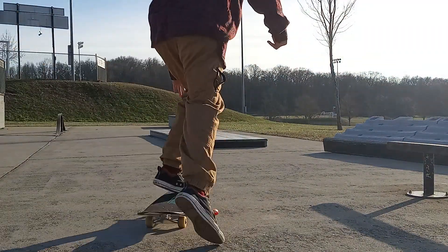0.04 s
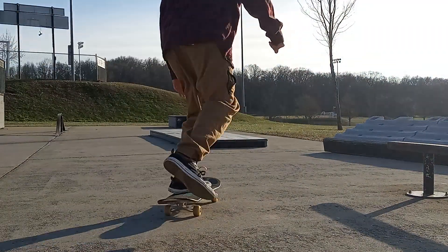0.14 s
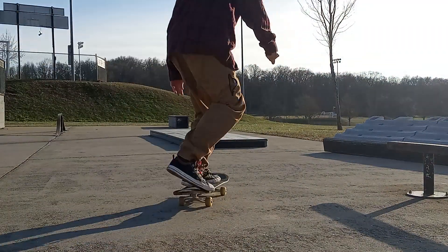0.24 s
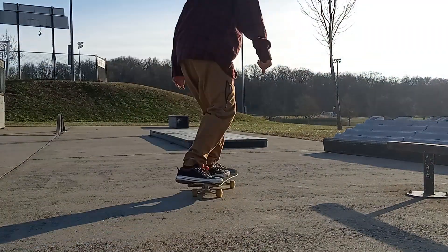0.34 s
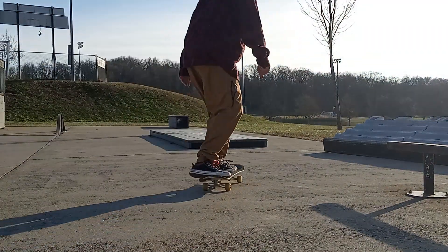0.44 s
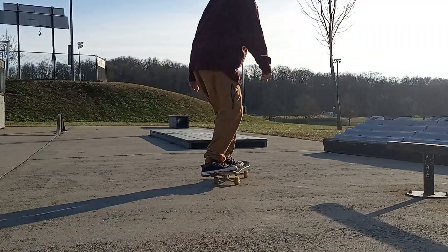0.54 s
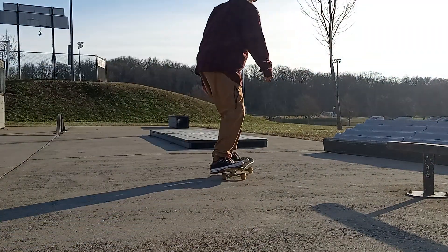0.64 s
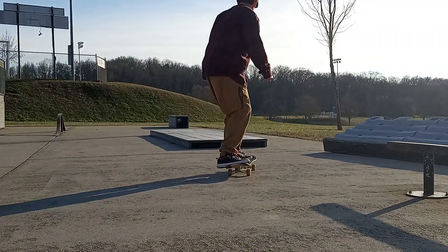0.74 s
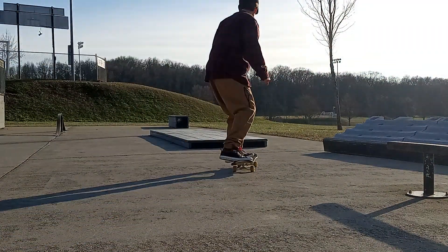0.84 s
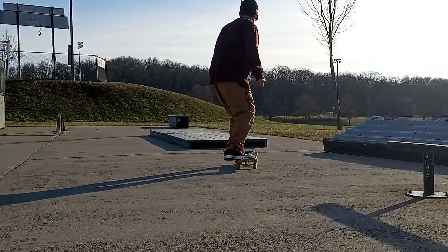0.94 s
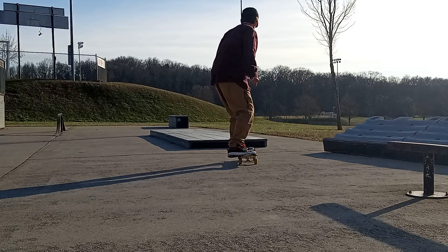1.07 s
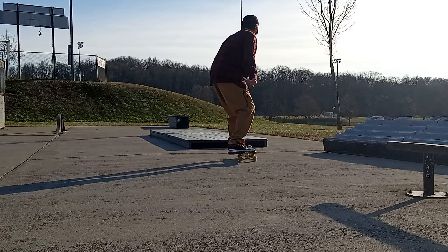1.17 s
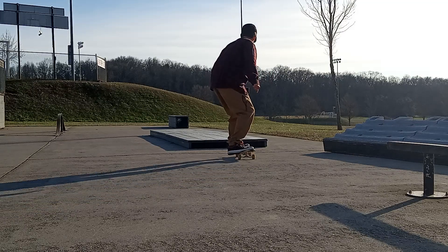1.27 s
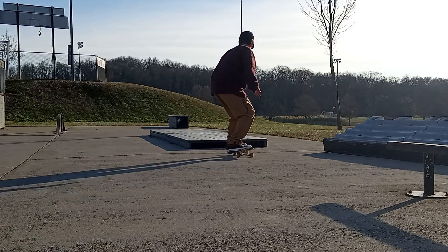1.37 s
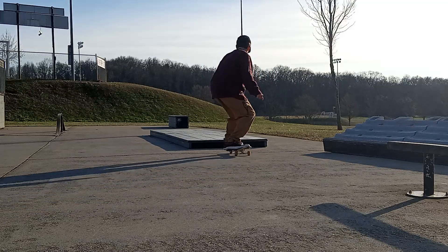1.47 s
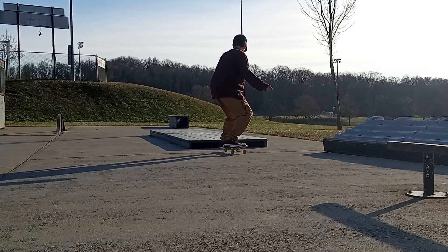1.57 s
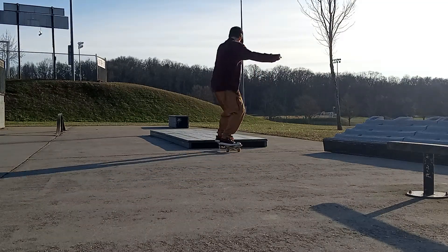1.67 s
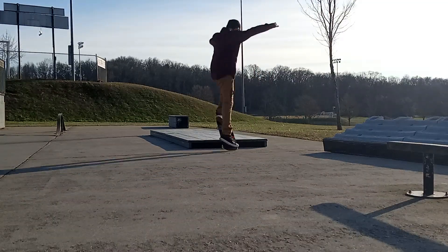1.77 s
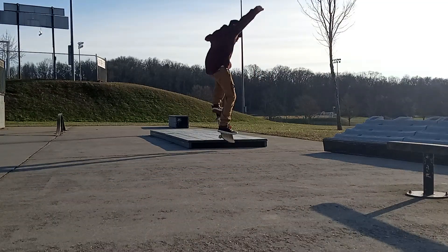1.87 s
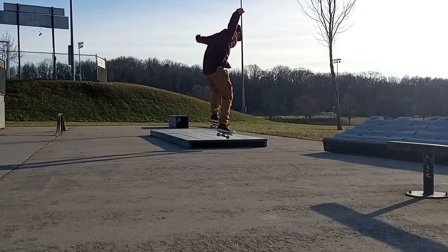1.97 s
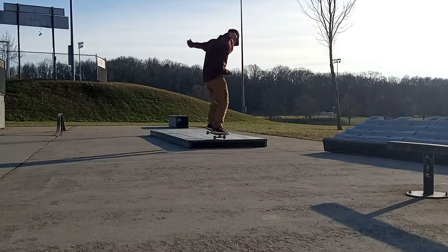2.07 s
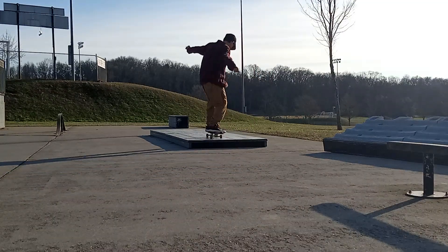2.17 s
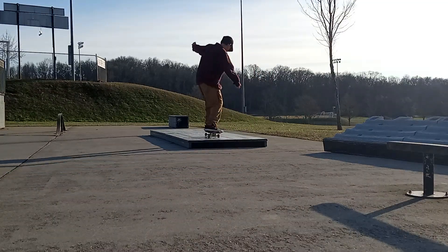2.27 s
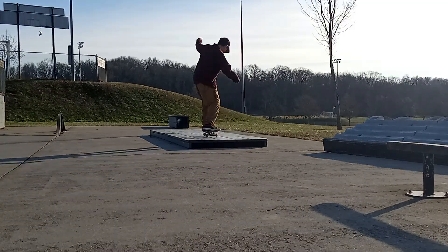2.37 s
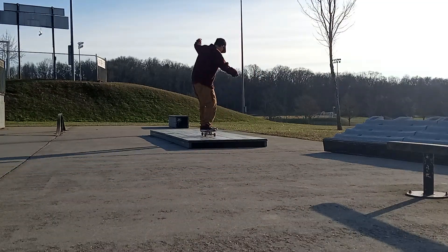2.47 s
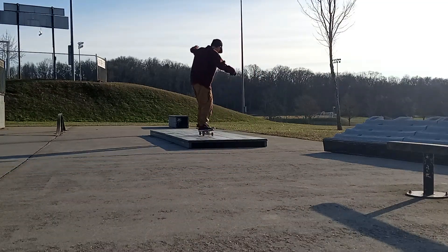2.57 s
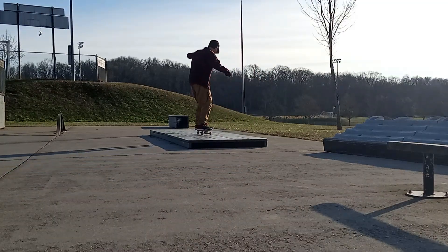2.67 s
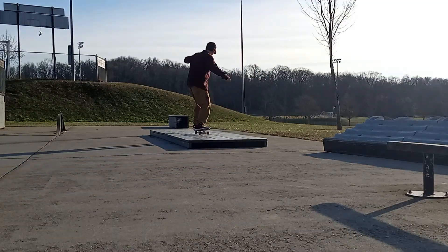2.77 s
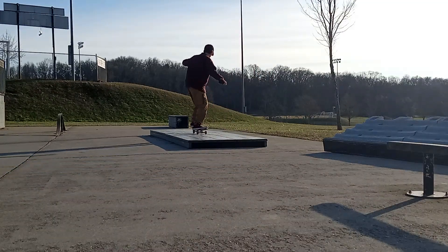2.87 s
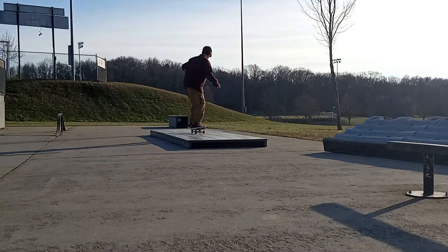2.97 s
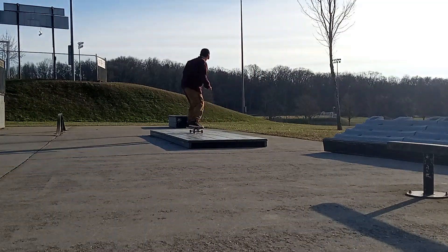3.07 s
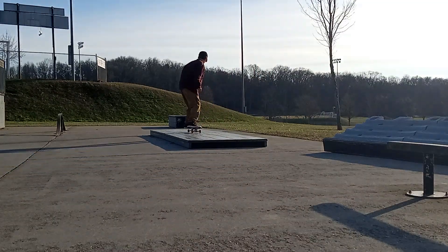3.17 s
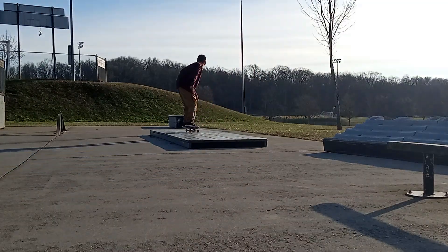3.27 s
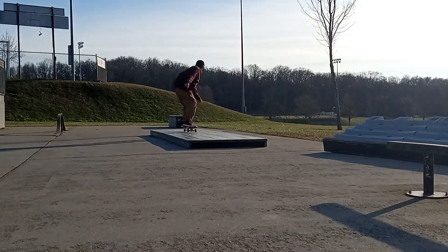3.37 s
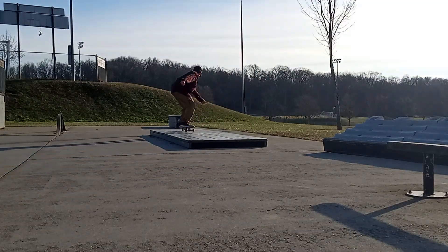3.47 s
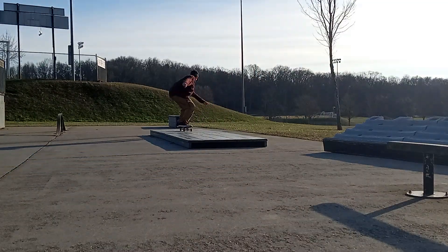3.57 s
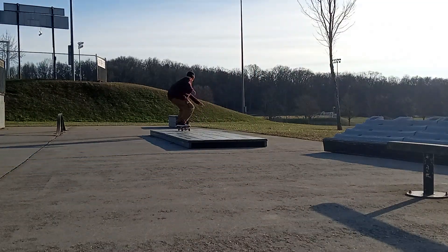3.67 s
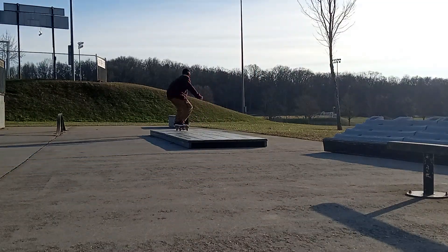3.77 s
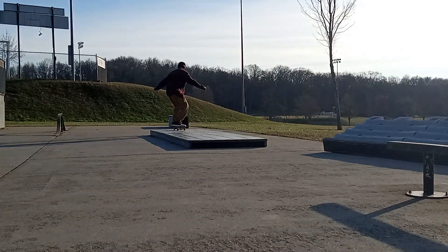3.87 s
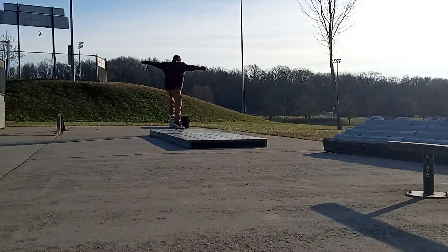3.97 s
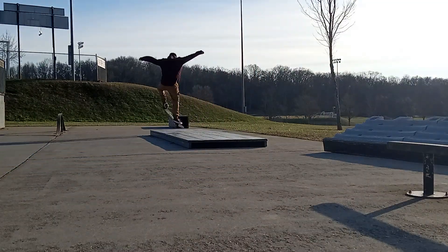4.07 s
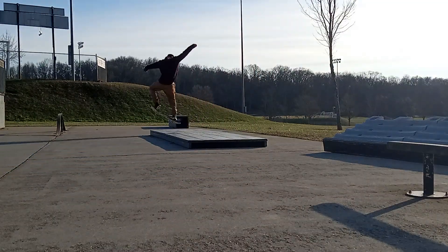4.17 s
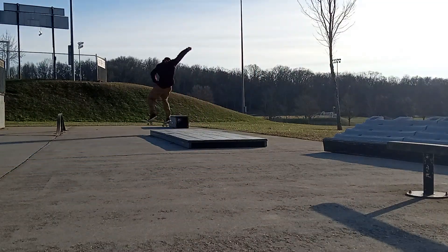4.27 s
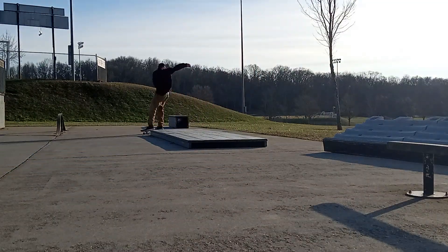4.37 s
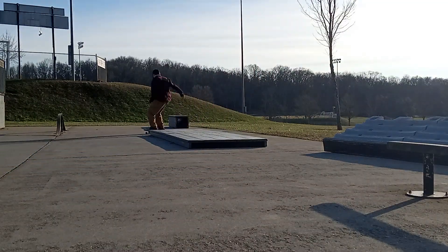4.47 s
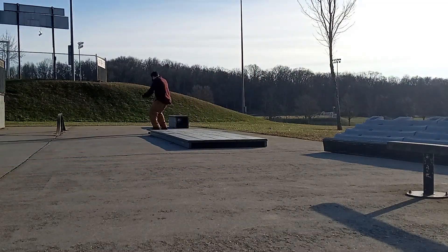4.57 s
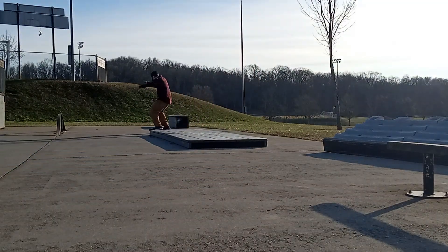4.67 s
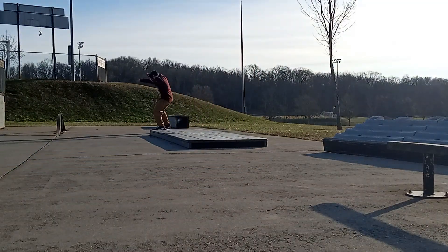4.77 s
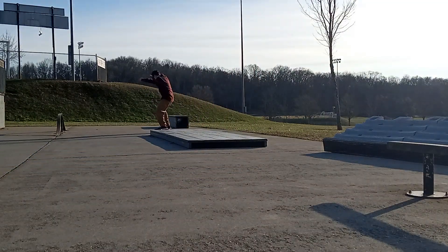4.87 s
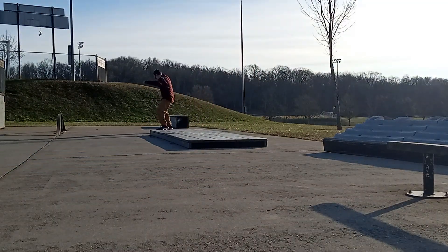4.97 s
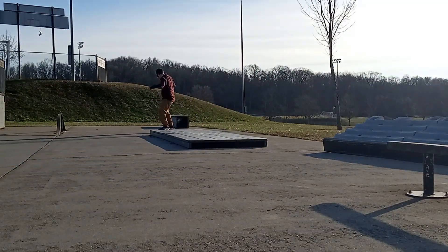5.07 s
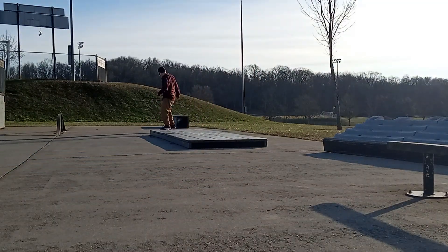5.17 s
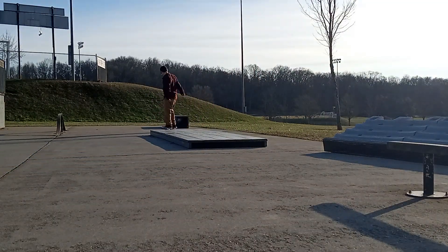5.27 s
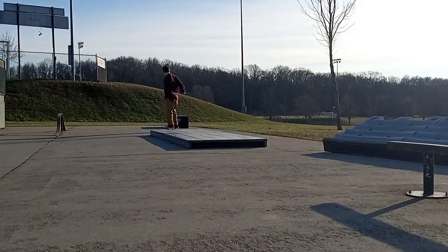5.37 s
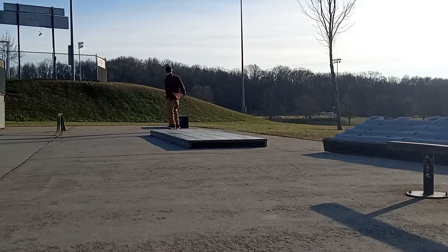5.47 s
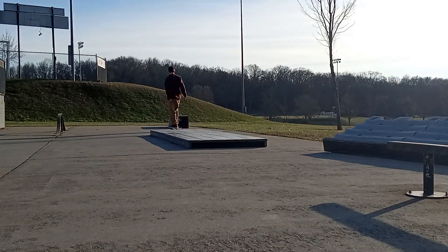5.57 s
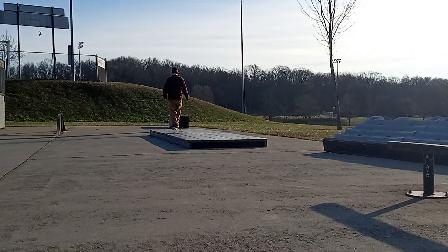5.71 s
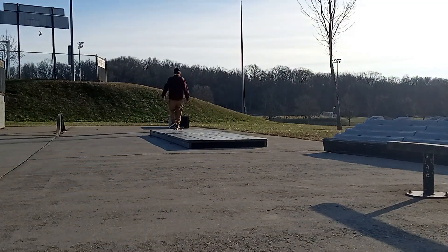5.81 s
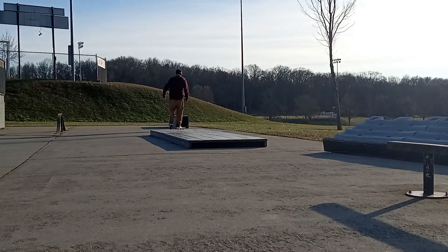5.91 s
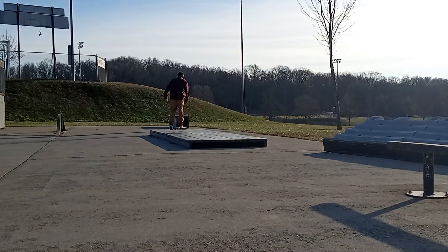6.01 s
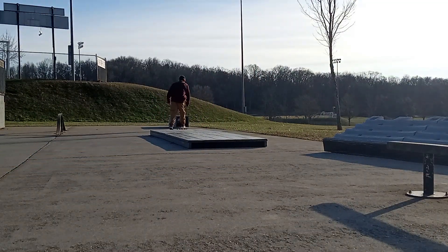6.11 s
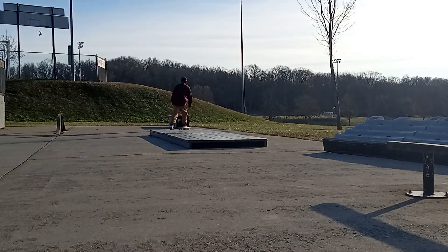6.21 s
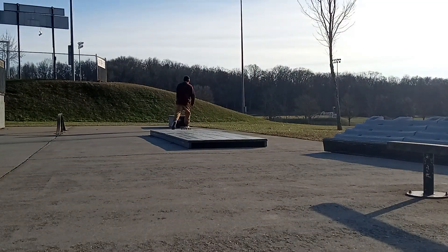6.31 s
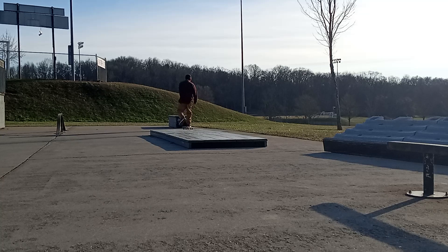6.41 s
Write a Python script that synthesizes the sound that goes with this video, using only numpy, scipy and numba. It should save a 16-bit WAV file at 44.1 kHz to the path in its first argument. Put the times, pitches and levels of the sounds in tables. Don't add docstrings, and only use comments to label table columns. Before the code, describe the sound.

Outdoors at a quiet skatepark, a phone lying near the run-up picks up a board slapping concrete loudly, then wheels grinding away over grit with small ticks and shoe squeaks. Wind thumps low on the left. The tail pops sharply, the board lands on a hollow box with a woody boom, seams knock, then a second pop and a distant crash. Only faint traffic hum and small knocks remain.

```python
import sys
import numpy as np
from scipy import signal
from scipy.fft import rfft, irfft, next_fast_len
from scipy.io import wavfile
from scipy.ndimage import uniform_filter1d
from numba import njit

SR = 44100
rng = np.random.default_rng(int(sys.argv[2]) if len(sys.argv) > 2 else 0)


def invert_db(x):
    u = np.asarray(x, float) / 20
    return 10 ** u


def log_audio(samples):
    frames = np.atleast_2d(samples).T
    limited = np.clip(frames, -1, 1)
    pcm = np.round(limited * 32767).astype(np.int16)
    wavfile.write(sys.argv[1], SR, pcm)


N = 284268
ON_BOX_S = 2.1
# peak_s, rise_s, low_mode_db, second_mode_db
BOX_BOOMS = [(2.132, 0.012, -28, -36), (2.445, 0.05, -46, -56), (2.602, 0.04, -39, -45),
             (2.768, 0.04, -49, -43), (2.895, 0.07, -42, -69), (3.012, 0.04, -37, -34),
             (3.212, 0.025, -32, -30), (3.515, 0.06, -53, -60.5), (3.685, 0.06, -58, -61),
             (3.895, 0.04, -50, -61), (4.025, 0.07, -40.5, -41), (4.148, 0.03, -49, -47)]


def unit(x):
    return x / np.sqrt(np.mean(x ** 2))


def columns(table):
    s, *rest = np.transpose(table)
    return [np.interp(np.arange(N) / SR, s, c) for c in rest]


def colour(x, points):
    size = next_fast_len(x.shape[-1])
    log_hz = np.log(np.fft.rfftfreq(size, 1 / SR) + 1)
    p = np.array(points)
    gain = invert_db(np.interp(log_hz, np.log(p[:, 0]), p[:, 1]))
    return irfft(rfft(x, size) * gain, size)[..., :x.shape[-1]]


@njit
def svf(x, hz, width):
    y, b, l = np.empty(len(x)), 0., 0.
    for i in range(len(x)):
        g, k = np.tan(np.pi * hz[i] / SR), width[i] / hz[i]
        v = (b + g * (x[i] - l)) / (1 + g * (g + k))
        b, l, y[i] = 2 * v - b, l + 2 * g * v, k * v
    return y


def band(x, hz, width):
    return svf(x, hz + 0 * x, width + 0 * x)


def between(x, lo_hz, hi_hz):
    return signal.sosfilt(signal.butter(4, [lo_hz, hi_hz], "band", fs=SR, output="sos"), x)


def walk(rate):
    k = int(SR / rate)
    held = np.repeat(rng.standard_normal(N // k + 1), k)
    return 1.8 * uniform_filter1d(uniform_filter1d(held, k), k)[:N]


def bumps(size, spread_db):
    grain = np.minimum(rng.exponential(size=size), 4)
    return rng.standard_normal(size) * invert_db(spread_db * grain)


def narrow(hz, width):
    x = band(band(rng.standard_normal(N), hz, width), hz, 2 * width)
    return x / np.sqrt(uniform_filter1d(x ** 2, size=SR // 25) + 0.27 * np.mean(x ** 2))


def swells(rows, fall_db_s):
    t, out = np.arange(0, N / SR + .01, .002), 0
    for s, rise, db in rows:
        before = 20 * (s - t) / max(rise, .003)
        after = fall_db_s * (t - s)
        out = out + invert_db(db - np.where(t < s, before, after))
    return np.interp(np.arange(N) / SR, t, out)


def park():
    # pitch_hz, level_db (per Hz)
    air = [(110, -23.5), (170, -1.5), (630, -6), (1600, -14.5), (2500, -18.5), (4000, -27.5), (6300, -30.5),
           (16000, -34.5)]
    # time_s, level_db
    traffic = [
        (4.3, -1),
        (4.9, 2.5),
        (5.1, -2.5),
        (5.5, 0.5),
        (5.9, -5.5),
        (6.1, 1.5),
        (6.45, 1.5),
    ]
    mid, side = (colour(rng.standard_normal(N), air) for _ in range(2))
    side = colour(side, [(100, -12.5), (500, -4.5), (1200, 0.5), (16000, -1.0)])
    level = invert_db(-75 + columns(traffic)[0])
    return level * (mid + side * np.array([[1], [-1]])) / np.std(mid)


def body(modes, drive, patchy_db, rate):
    out = 0
    for hz, width, db in modes:
        own = drive + 0.99 * rng.standard_normal(N)
        centre = hz * (1 + walk(6) / 40)
        mode = unit(band(band(own, centre, width), centre, 6 * width))
        out = out + invert_db(db + patchy_db * walk(rate)) * mode
    return unit(out)


def by_surface(concrete, box, spinning):
    t, off_box_s = np.arange(N) / SR, 4.2
    return np.where(t < ON_BOX_S, concrete, np.where(t < off_box_s, box, spinning))


def wheels():
    # time_s, level_db
    distance = [(0, -31), (.14, -47), (.21, -42), (.36, -38), (.62, -43.5), (.84, -49), (.93, -48.5),
                (1.2, -53.5), (1.64, -53.5), (1.73, -51.5), (1.83, -61.5), (2.06, -67.5), (2.14, -64.5),
                (3.4, -67.5), (3.98, -64.5), (4.2, -88.5), (4.66, -85), (4.8, -96)]
    # pitch_hz, width_hz, level_db
    deck_modes = [(228, 80, -3.5), (322, 90, -3), (418, 110, -2.5), (520.2, 94, -0.5), (636.2, 83, -2.5),
                  (750, 140, -5.5)]
    # pitch_hz, width_hz, level_db
    truck_modes = [(1025, 180, -3.5), (1127.6, 150, 17.5), (1480, 130, 13), (1850, 190, 6.5),
                   (1896, 140, 11.5), (2350, 91, -5), (2440, 79, -5.5)]
    # pitch_hz, width_hz, level_db
    grit_modes = [(3040, 1800, 0.5), (3960, 800, 5.5), (5100, 700, -9), (5770, 2800, -16)]
    load = invert_db(columns(distance)[0])
    shake = invert_db(-16.5) * swells(np.array(BOX_BOOMS)[:, [0, 1, 3]], fall_db_s=328)
    grains, rough = bumps(N, spread_db=4), walk(60)
    drive = unit(grains * invert_db(3.2 * rough))
    hiss = bumps(N, spread_db=5.0) * invert_db(1.3 * rough)
    hiss = colour(hiss, [(2500, -26.5), (6000, 0.5), (11000, 2), (16000, 6)])
    grit = body(grit_modes, drive, patchy_db=1.3, rate=30) + invert_db(-5.0) * unit(hiss)
    deck = body(deck_modes, drive, patchy_db=3, rate=16)
    trucks = body(truck_modes, drive, patchy_db=3, rate=16)
    trucks = trucks + invert_db(-10) * unit(between(drive, 480, 2600))
    trucks = invert_db(by_surface(concrete=-2.5, box=-3.5, spinning=6)) * trucks
    grit = invert_db(by_surface(concrete=-11.5, box=-14.5, spinning=4.5)) * grit
    return (load + shake) * invert_db(3) * deck + load * (trucks + grit)


def slips(table, share):
    out = np.zeros(N + SR)
    for s, length, hz, glide, db in table:
        u = np.linspace(0, 1, int(length * SR))
        track = hz * glide ** u
        grip = bumps(SR // 2, spread_db=2)[:len(u)]
        slip = band(band(grip, track, share * hz), track, 2 * share * hz)
        swell = 1.2 * np.sin(np.pi * u ** .8)
        out[int(s * SR):int(s * SR) + len(u)] += invert_db(db) * unit(slip) * swell
    return out[:N]


def shoe_scuffs():
    # start_s, length_s, pitch_hz, glide_ratio, level_db
    scuffs = [(0.0, 0.02, 3200, 1.2, -39), (1.88, 0.09, 4100, 0.95, -50), (5.712, 0.05, 1510, 1.02, -70),
              (0.010, 0.022, 988, 1.03, -32), (1.228, 0.11, 1330, 0.88, -51),
              (4.278, 0.04, 2600, 0.97, -79), (1.925, 0.075, 1750, 0.95, -49),
              (2.645, 0.05, 1950, 1.13, -59), (3.985, 0.075, 2300, 0.97, -63),
              (5.662, 0.07, 2280, 0.96, -70), (6.05, 0.39, 600, 1.16, -73), (5.41, 0.27, 369, 1.026, -78),
              (1.865, 0.025, 4000, 1.0, -35)]
    return slips(scuffs, share=.16)


def deck_groans():
    # start_s, length_s, pitch_hz, glide_ratio, level_db
    groans = [(0.0, 0.035, 520, 1.4, -34), (0.995, 0.11, 220, 0.88, -47), (1.69, 0.09, 300, 0.85, -47),
              (0.77, 0.15, 205, 0.95, -47), (0.034, 0.035, 250, 0.95, -39), (4.972, 0.03, 330, 1.0, -60),
              (5.732, 0.04, 370, 1.0, -67), (4.478, 0.08, 225, 0.9, -55), (0.157, 0.045, 380, 0.85, -32),
              (0.63, 0.14, 430, 0.9, -45), (1.535, 0.09, 230, 1.0, -53), (3.19, 0.08, 600, 0.9, -39),
              (4.49, 0.08, 650, 0.9, -37)]
    return slips(groans, share=0.42)


def shoe_squeaks():
    # start_s, length_s, pitch_hz, glide_ratio, level_db
    chirps = [(0.585, 0.09, 534, 0.96, -40), (1.822, 0.048, 2210, 1, -52), (1.985, 0.045, 2440, 0.99, -59),
              (0.008, 0.018, 1850, 1, -28), (1.355, 0.16, 1480, 0.92, -53), (1.44, 0.09, 2010, 0.93, -56),
              (2.6, 0.11, 2350, 1.1, -60), (3.895, 0.06, 3210, 0.81, -79), (4.66, 0.045, 2350, 1.06, -74),
              (5.662, 0.04, 3400, 0.95, -68), (6.11, 0.055, 3590, 0.86, -81), (6.2, 0.09, 610, 1.0, -70)]
    return slips(chirps, share=0.081)


def rumble():
    # peak_s, rise_s, level_db
    wind = [(0.025, 0.05, -59), (0.83, 0.08, -53), (1.0, 0.08, -53), (1.14, 0.04, -49), (1.23, 0.05, -42.5),
            (1.422, 0.02, -34), (1.555, 0.03, -42), (1.598, 0.02, -37), (1.672, 0.03, -41.5),
            (1.735, 0.03, -46), (1.808, 0.03, -37), (1.942, 0.05, -44), (2.045, 0.04, -53)]
    # peak_s, rise_s, level_db
    thumps = [
        (4.502, 0.03, -59),
        (4.995, 0.1, -63.5),
        (5.585, 0.08, -66.5),
        (5.99, 0.08, -59.5),
        (5.85, 0.06, -63.5),
        (6.395, 0.08, -62.5),
        (5.46, 0.05, -66.5),
    ]
    gusts = swells(wind, fall_db_s=298.5)
    far = invert_db(-70 + 2.2 * walk(9)) + swells(thumps, fall_db_s=161)
    slow = uniform_filter1d(gusts, size=SR // 6) + far
    buffet = np.array([invert_db(-8) * narrow(41, 40), invert_db(-24.0) * narrow(48, 40)]) * slow
    lee = invert_db(np.array([[0], [-21]]))
    return gusts * narrow(90, 43) * lee + far * narrow(82, 48) + buffet


def clacks(table):
    out, t = np.zeros(N + SR), np.arange(SR // 20) / SR
    sag, rise_s = .2, .0004
    for s, db, hz, t60 in table:
        turns = 2 * np.pi * hz * ((1 - sag / 2) * t + sag * .002 * (1 - np.exp(-t / .002)))
        fade = invert_db(-60 * t / max(t60, .003))
        upper = invert_db(-9) * fade * np.sin(1.55 * turns)
        lower = invert_db(-13) * np.sin(.62 * turns)
        knock = (np.sin(turns) + upper - lower) * fade * (1 - np.exp(-t / rise_s))
        out[int(s * SR):int(s * SR) + len(t)] += invert_db(db) * knock / np.abs(knock).max()
    return out[:N]


def hardware_clacks():
    # start_s, peak_db, pitch_hz, t60_s
    loose_parts = [(0.050, -28, 2100, .018), (0.062, -29, 2200, .018), (0.083, -33, 2400, .015),
                   (0.110, -26, 2400, .015), (0.137, -33, 2200, .02), (0.1585, -7, 1550, .012),
                   (0.1595, -21, 4200, .007), (0.1618, -12, 1100, .018), (0.167, -25, 4200, .01),
                   (0.167, -18, 1000, .018), (1.8665, -19, 2050, .012), (1.8695, -10, 1550, .018),
                   (1.870, -19, 4000, .008), (1.877, -21, 1400, .014), (1.8815, -16, 2050, .009),
                   (1.8853, -18, 1950, .009), (1.889, -24, 1700, .01), (1.893, -27, 1700, .015),
                   (1.927, -28, 2300, .01), (1.938, -31, 2400, .014), (1.947, -33, 2100, .012),
                   (1.953, -34, 2000, .012), (2.582, -36, 2500, .025), (2.584, -32, 1400, .02),
                   (2.980, -38, 2500, .015), (2.980, -45, 3900, .015), (2.987, -37, 2250, .018),
                   (2.995, -39, 2350, .018), (3.004, -42, 2100, .015), (3.013, -43, 2200, .015),
                   (3.1862, -18, 720, .02), (3.1935, -16.5, 950, .022), (4.1215, -23, 2150, .014),
                   (4.125, -25, 1200, .02), (4.129, -27, 2500, .014), (4.137, -34, 2800, .012),
                   (4.155, -33, 1300, .025), (4.163, -37, 1300, .015), (4.177, -41, 2000, .012),
                   (4.188, -43, 2200, .012), (4.475, -24, 2200, .01), (4.479, -20, 1200, .012),
                   (4.486, -14, 950, .025), (4.486, -30, 5400, .03), (4.491, -19, 1100, .014),
                   (4.510, -19, 1500, .014), (4.526, -27, 2600, .012), (4.537, -27, 1900, .012),
                   (4.541, -27, 800, .025), (4.562, -31, 1500, .014)]
    # start_s, peak_db, pitch_hz, t60_s
    more_clacks = [(0.0385, -21, 1300, .01), (0.1585, -14, 2300, .01), (1.871, -21, 2900, .008),
                   (2.1192, -17, 1500, .012), (2.1195, -27, 2600, .02), (2.1225, -20, 1000, .02),
                   (2.128, -21, 950, .02), (2.244, -46, 1950, .03), (2.286, -46, 2400, .015),
                   (2.416, -51, 1500, .02), (2.672, -47, 2200, .025), (2.651, -49, 2050, .025),
                   (3.186, -38, 2600, .02), (4.1192, -27, 2700, .008), (4.4857, -22, 2600, .008),
                   (4.507, -20, 1400, .012), (4.520, -27, 2300, .012), (4.532, -31, 2500, .012)]
    return clacks(loose_parts) + clacks(more_clacks)


def ring(modes, t, detune):
    out = 0
    for (hz, db, t60), d in zip(modes, detune):
        out = out + invert_db(db + 1.2 * d) * np.sin(2 * np.pi * hz * (1 + d / 30) * t) * invert_db(-60 * t / t60)
    return out


def blows(table, hollow, thud_db, top_db, thud_stretch, late_s, bottom_hz):
    # pitch_hz, level_db, t60_s
    axles = [(900, -7, 0.016), (1010, -6, 0.013), (1360, -2, 0.013), (1530, -1, 0.018), (1750, -0.5, 0.012),
             (1900, -7.5, 0.011), (2107, -7.5, 0.017), (2280, -3.5, 0.012), (2607, -4.5, 0.041),
             (3080, 5, 0.0062)]
    out, t = np.zeros(N + SR), np.arange(SR // 400 * 100) / SR
    touch = 40
    for s, db, hz, snap_db, t60 in table:
        t60 = max(t60, .005)
        uneven = invert_db(2 * np.repeat(rng.standard_normal(len(t) // 100), 100))
        rattle = 0.043 * bumps(len(t), spread_db=5.0) * uneven
        detune = rng.standard_normal(20)
        contact = rattle * invert_db(-60 * t / t60)
        contact[touch] += 1
        push = rattle * invert_db(-60 * t / (t60 * thud_stretch)) * (1 - np.exp(-t / late_s))
        near = [(f, g - 12 * np.log2(f / hz) ** 2, d) for f, g, d in axles]
        crack = signal.fftconvolve(contact, ring(near, t, detune))[:len(t)]
        crack = between(crack, .6 * hz, min(2.55 * hz, 2900))
        thud = signal.fftconvolve(push + 0.18 * contact, ring(hollow, t, detune[10:]))[:len(t)]
        thud = between(thud, bottom_hz, 1700)
        snap = band(between(contact, 2350, 7000), 4000, 2200)
        snap = snap + invert_db(top_db) * between(contact, 6500, 16000)
        i = int(s * SR) - touch
        for part, part_db in ((crack, 2.5), (thud, 4.0 + thud_db), (-snap, 11.0 + snap_db)):
            out[i:i + len(t)] += invert_db(db + part_db) * part / np.abs(part).max()
    return out[:N]


def board_blows(table, thud_db, top_db):
    # pitch_hz, level_db, t60_s
    wood = [(300, -10, 0.02), (420, 0.5, 0.03), (610, 8.5, .04), (744, 5.5, 0.03)]
    return blows(table, wood, thud_db, top_db, thud_stretch=0.96, late_s=0.0041, bottom_hz=221.2)


def throw_down():
    # start_s, crack_peak_db, crack_centre_hz, snap_minus_crack_db, rattle_t60_s
    hits = [
        (0.039, -21, 1900, -13, 0.09),
        (0.104, -28, 2080, -17.5, 0.2),
        (0.159, -15, 1457, -13, 0.05),
        (0.185, -28, 820, -11, 0.081),
        (0.32, -35.5, 1180, -13.5, 0.027),
        (0.35, -30, 1030, -11, 0.019),
        (0.423, -31, 1170, -15.5, .07),
        (1.078, -38, 1350, -28, 0.16),
        (1.251, -47, 1480, -15.5, 0.22),
    ]
    return board_blows(hits, thud_db=-7, top_db=-12)


def box_drum():
    t, rows = np.arange(N) / SR, np.array(BOX_BOOMS)
    riding = uniform_filter1d(1. * ((t > ON_BOX_S) & (t < 4.1)), size=SR // 20)
    deck_boom = swells([(.165, 0.028, -35.5)], fall_db_s=60)
    low = swells(rows[:, :3], fall_db_s=193) + riding * invert_db(-64.5 + 2.1 * walk(12)) + deck_boom
    second = swells(rows[:, [0, 1, 3]], fall_db_s=255) + riding * invert_db(-68.5)
    return low * narrow(114, 35) + second * narrow(253.0, 16.5)


def pebbles():
    # start_s, peak_db, pitch_hz
    flicks = [(0.2856, -39, 1030), (0.3161, -39, 802), (0.331, -34, 834), (0.35, -30, 1050),
              (0.4233, -27, 1170), (0.5151, -42, 1160), (0.5341, -40, 805), (0.5964, -40, 1810),
              (0.7127, -42, 802), (0.7436, -40, 1150), (0.794, -41, 1850), (0.8763, -45, 1890),
              (0.9456, -43, 1730), (1.008, -47, 1160), (1.026, -49, 1410), (1.0654, -42, 1270),
              (1.0788, -40, 1410), (1.1427, -49, 1430), (1.1886, -50, 1110), (1.23, -49, 1570),
              (1.2385, -46, 1150), (1.2504, -44, 1480), (1.3732, -45, 1420), (1.4206, -44, 1440),
              (1.462, -45, 1500), (1.4894, -43, 1510), (1.667, -50, 1930), (1.6949, -45, 999),
              (1.7708, -47, 802)]
    return clacks([(s, db - 3, hz, .014) for s, db, hz in flicks])


def pops():
    # start_s, crack_peak_db, crack_centre_hz, snap_minus_crack_db, rattle_t60_s
    hits = [
        (1.869, -22, 1800, -11, 0.07),
        (1.858, -41, 2100, -14, 0.2),
        (1.925, -34, 2300, -20, 0.17),
        (4.119, -26, 1900, -19, 0.14),
        (4.154, -40, 1600, -20, .14),
    ]
    return board_blows(hits, thud_db=-17, top_db=-31)


def panels_and_scuffs():
    # start_s, length_s, pitch_hz, glide_ratio, level_db
    loose_bands = [(2.285, 0.045, 505, 1.0, -48), (2.99, 0.055, 450, 1.0, -41), (3.185, 0.035, 805, 0.9, -33),
                   (3.2, 0.09, 700, 0.95, -49), (2.978, 0.045, 2300, 1.0, -56), (2.895, 0.04, 850, 1.0, -59),
                   (2.665, 0.05, 490, 1.0, -57), (2.85, 0.05, 480, 1.0, -56), (2.566, 0.03, 2400, 1.05, -56),
                   (4.466, 0.01, 1200, 1.0, -58), (4.112, 0.008, 1000, 1.1, -50), (4.118, 0.04, 2700, .9, -47),
                   (1.895, .035, 2200, 1.0, -46)]
    return slips(loose_bands, share=0.13)


def box_landings():
    # start_s, crack_peak_db, crack_centre_hz, snap_minus_crack_db, rattle_t60_s
    hits = [(2.105, -40, 1320, -10.5, 0.12), (2.119, -19, 832, -18, 0.13), (2.243, -46, 1890, -19, 0.066),
            (2.286, -39, 900, -24, 0.042), (2.414, -46, 830, -23.5, 0.021), (2.581, -37, 1500, -15, 0.071),
            (2.672, -55, 2170, -22, .054), (2.739, -43.5, 1160, -19.5, 0.03), (2.859, -51, 700, -27, 0.075),
            (2.978, -29.5, 800, -22.5, .057), (3.001, -38, 1114, -25.5, 0.087),
            (3.186, -26, 600, -19, 0.08), (3.2, -28.5, 640, -44, 0.13), (3.239, -48, 816, -25, .08)]
    # pitch_hz, level_db, t60_s
    hollow = [(247, -36, 0.19), (331.6, -3.5, 0.1), (416, -4.5, 0.17), (508, -3.5, 0.15), (610, 4, 0.049),
              (704.7, 11.5, 0.022), (838, 6.5, 0.033), (962, 3, 0.06)]
    return blows(hits, hollow, thud_db=-2, top_db=-13.5, thud_stretch=1.66, late_s=0.0035, bottom_hz=209)


def crash():
    # start_s, crack_peak_db, crack_centre_hz, snap_minus_crack_db, rattle_t60_s
    hits = [(4.474, -27, 1326, -9, 0.071), (4.4855, -17, 1000, -17, 0.06), (4.503, -24, 1500, -13, 0.17),
            (4.54, -28, 940, -17, 0.087), (4.552, -33, 1400, -17, 0.12), (4.968, -44.5, 1630, -21, .14),
            (4.982, -42.5, 1820, -16, 0.08), (5.474, -67, 2100, -18, .085),
            (5.676, -56.5, 2180, -16.5, 0.2), (5.747, -56, 1530, -23.5, .07),
            (5.815, -64.5, 2360, -20, 0.064), (6.209, -64, 2010, -10.5, .09), (6.244, -60, 1600, -14, .07)]
    return board_blows(hits, thud_db=-12.5, top_db=-13)


def bank_echo(hits):
    t = np.arange(SR // 2) / SR
    banks = rng.standard_normal((2, len(t))) * invert_db(-60 * t / 0.18) * (t > .012)
    banks = colour(banks, [(200, -35.5), (500, -7), (1500, 0.5), (5000, -22)])
    return invert_db(-43.5) * signal.fftconvolve(hits[None], banks, axes=1)[:, :N]


def at_ports(mid):
    # pitch_hz, level_db
    difference = [(100, -27), (500, -16), (1500, -12), (4000, -5), (9000, -1)]
    scatter = rng.standard_normal(1500) * np.exp(-np.arange(1500) / 400)
    scattered = signal.fftconvolve(mid, scatter / np.linalg.norm(scatter))[:N]
    side = colour(scattered * walk(70), difference)
    side += np.linspace(.3, 1.2, N) * np.gradient(mid)
    return mid * invert_db(np.array([[.4], [-.4]])) + side * np.array([[1], [-1]])


def scene():
    hits = throw_down() + pops() + crash() + box_landings() + hardware_clacks() + pebbles()
    rubbing = shoe_scuffs() + deck_groans() + shoe_squeaks() + panels_and_scuffs()
    board = hits + wheels() + rubbing
    return at_ports(board) + bank_echo(hits) + box_drum() + rumble() + park()


def low_pass(x):
    return signal.sosfilt(signal.butter(12, 16250, fs=SR, output="sos"), x)


def record(dry):
    # pitch_hz, level_db
    response = [(30, -11), (70, -2), (6500, -2), (7900, -6.5), (9800, -3), (13400, -6), (14400, 1),
                (15600, 4), (16100, -26)]
    mix = colour(dry, response)
    return low_pass(mix)


dry = scene()
out = record(dry)
log_audio(out)
```